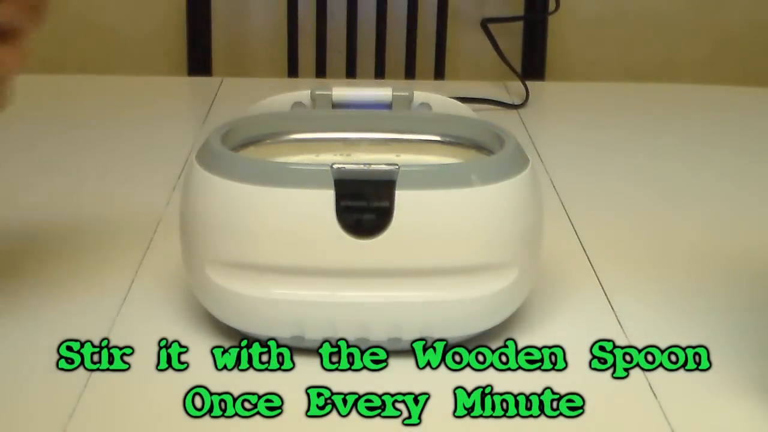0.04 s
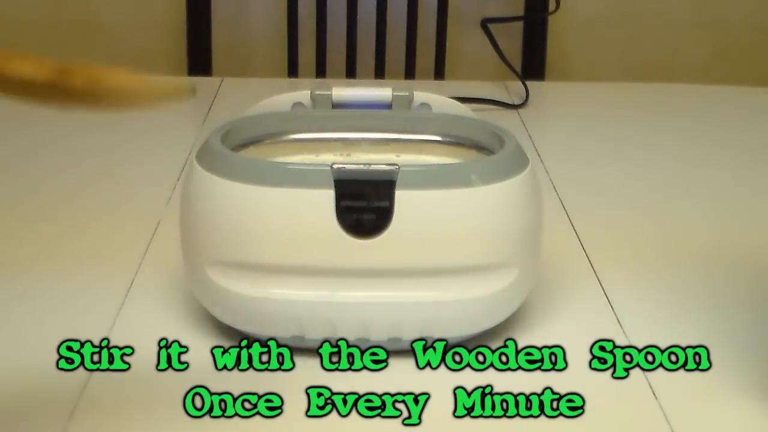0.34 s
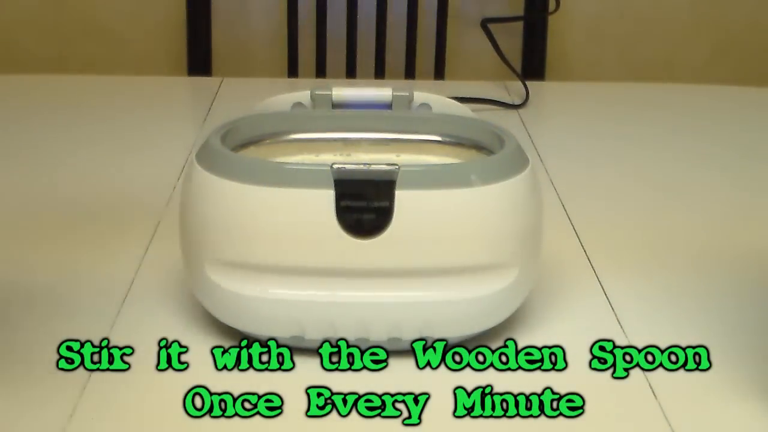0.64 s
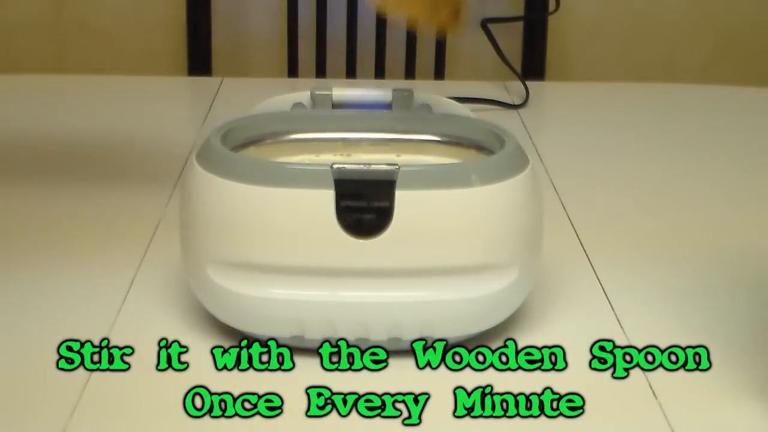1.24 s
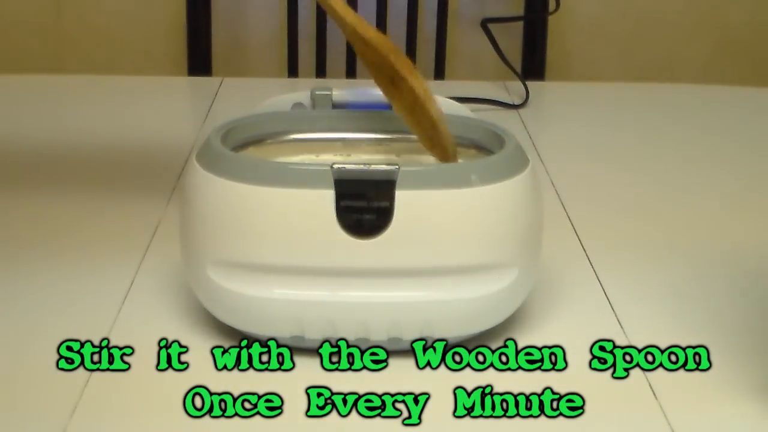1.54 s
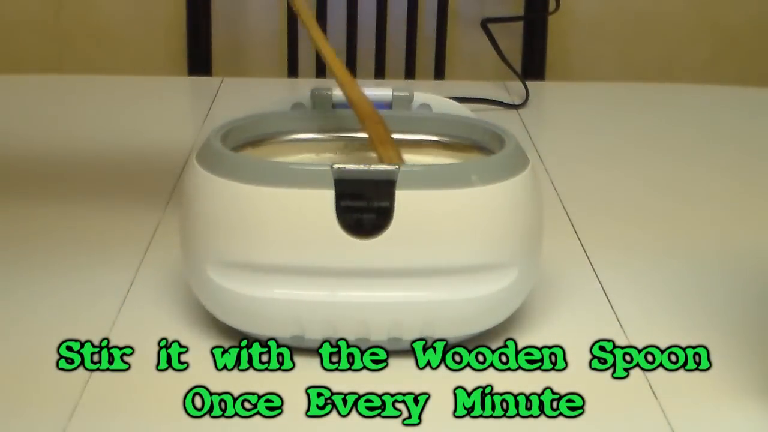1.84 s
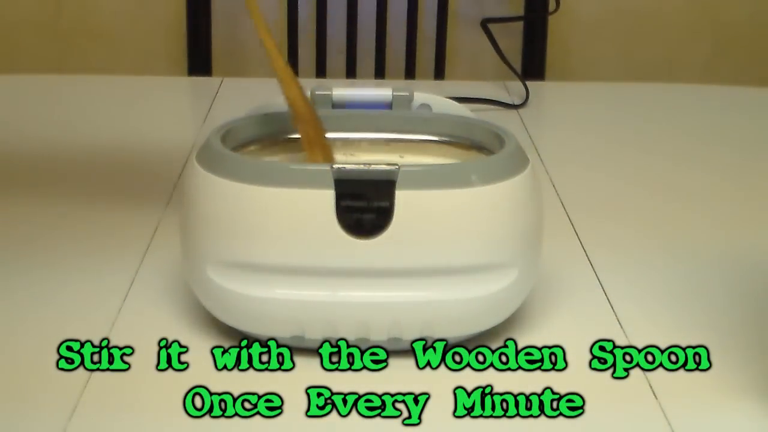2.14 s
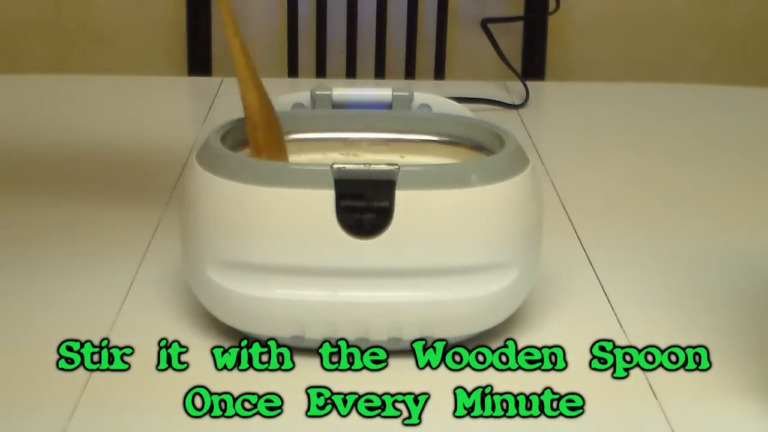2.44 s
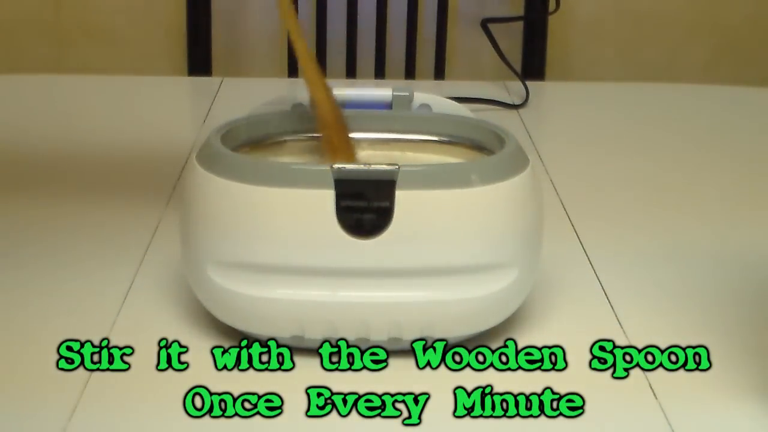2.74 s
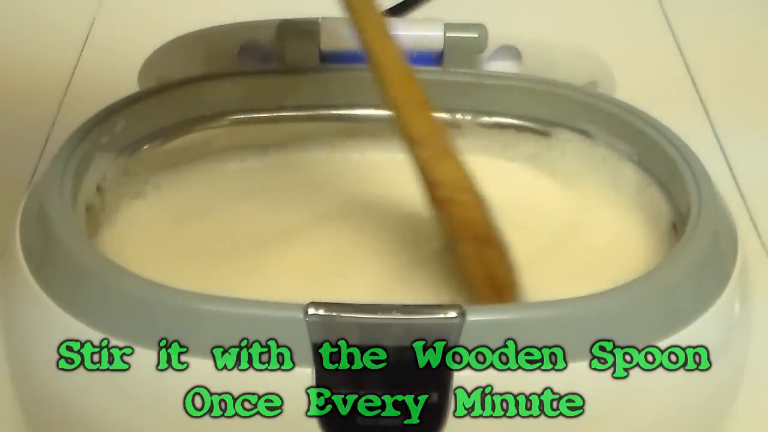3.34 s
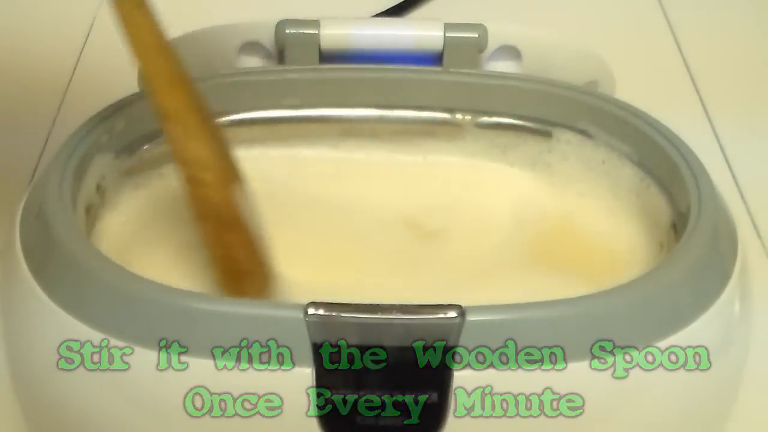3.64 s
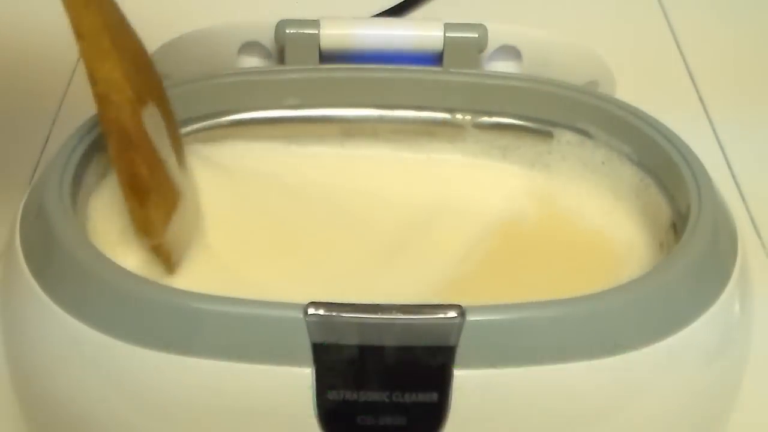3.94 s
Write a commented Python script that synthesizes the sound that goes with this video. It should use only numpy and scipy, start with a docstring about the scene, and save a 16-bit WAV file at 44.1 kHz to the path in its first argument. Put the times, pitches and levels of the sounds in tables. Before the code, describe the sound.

Fizzy ultrasonic cleaner buzz, turning close and raspy as a spoon stirs, with low thumps.

```python
"""An ultrasonic cleaner full of foamy liquid buzzes on a table: its tank rattles at harmonics of the mains,
and cavitation bubbles collapse in step, making the bath fizz. A wooden spoon dips in, loads the bath and
dulls the buzz, then knocks the tank into ringing and stirs. Heard first from afar and then from close by,
the buzz becomes one raspy burst per mains cycle over sloshing liquid.
Low thumps and a rumble open and close the scene."""
import sys
import numpy as np
from scipy import signal
from scipy.fft import rfft, irfft
from scipy.io import wavfile

SR = 44100
rng = np.random.default_rng(int(sys.argv[2]) if len(sys.argv) > 2 else 0)


def store_pcm(level_fs):
    """Save levels as 16-bit WAV."""
    pcm = np.round(np.clip(level_fs, -1, 1) * 32767).astype(np.int16)
    wavfile.write(sys.argv[1], SR, np.atleast_2d(pcm).T)


N = 176400
TIME = np.arange(N) / SR

MAINS_HZ, FIRST_HARMONIC = 60.0, 10
CLOSE_S, CROSSFADE_S = 2.94, 0.014  # when the bath is heard from close by
RING_HZ, RING_LAG_S = 1490, 0.00089  # each rattle rings around this pitch; lower partials arrive later
LOAD_LIFT_DB, LOAD_CUT_DB, LOAD_BAND_HZ, LOAD_EDGE_WIDTH_HZ = 3.2, -11, 750, 60
SWAY_CORRELATION = 0.7  # between neighbouring harmonics
THUMP_RISE_S, THUMP_T60_S = 0.018, 0.081
HISS_TOP_HZ, CUTOFF_HZ = 14400, 15800

# stereo image of the noises
COHERENCE = [(290, 0.62), (900, 0.56), (3100, 0.55), (6820, 0.2), (15000, 0.29)]  # (frequency [Hz], left-right coherence [0-1])
LEFT_BIAS = [(150, -6.5), (700, -1.5), (15000, 0.5)]  # (frequency [Hz], left minus right at apart=1 [dB])

# noise spectra (frequency [Hz], relative density [dB])
ROOM_SPECTRUM = [(35, -89.5), (70, -95), (350, -92.5), (560, -99), (1500, -108), (14000, -121)]
RUMBLE_SPECTRUM = [(48, -100), (80, -68.5), (130, -63.5), (190, -67.5), (255, -71), (310, -81.5),
                   (520, -73), (800, -91), (1500, -87), (3000, -94), (15000, -107)]
SLOSH_SPECTRUM = [(60, -100), (110, -89.5), (140, -80.5), (190, -89), (300, -85), (430, -89), (560, -76),
                  (680, -93), (900, -100), (2000, -120)]
DRAG_SPECTRUM = [(2500, -120), (3300, -99), (3800, -102), (4600, -90), (5300, -104), (8000, -120)]
FIZZ_SPECTRUM = [(200, -112), (500, -98.5), (1100, -96), (1650, -97.5), (2200, -97.5), (3000, -101),
                 (3900, -101.5), (4500, -104), (6500, -104), (8600, -106), (11500, -111), (14000, -112)]
STIRRED_FIZZ_SPECTRUM = [(300, -110), (700, -91), (1100, -111), (1600, -104), (2150, -99), (2600, -96.5),
                         (3200, -96.5), (3800, -105), (9000, -122)]
CLOSE_FIZZ_SPECTRUM = [(300, -110), (800, -96), (1900, -93.5), (2110, -94), (2300, -92), (3050, -96.5),
                       (3800, -95), (4800, -100), (6200, -100), (7100, -99.5), (8600, -103), (14000, -112)]
SIZZLE_SPECTRUM = [(4000, -125), (6500, -108), (7200, -103), (8600, -108), (10300, -94.5), (11700, -105),
                   (12800, -104), (14200, -107)]

# envelopes of the noises and of the buzz (time [s], gain [dB])
RUMBLE_GAIN = [(0, 1), (.06, 0), (.12, -6), (.165, -9), (.21, -43), (3.86, -65), (3.89, -3), (3.94, 1)]
SLOSH_GAIN = [(2.95, 1), (3.02, -0.5), (3.1, -5), (3.17, 1), (3.25, -5), (3.45, -2), (3.6, 0), (3.75, 2),
              (3.82, -2.5)]
DRAG_GAIN = [(2.63, -40), (2.66, 2), (2.73, -1.5), (2.81, -13), (2.9, -14)]
FIZZ_GAIN = [(0, 1.5), (.8, -2), (1.12, 0.5), (1.3, -.5), (1.7, 0), (2.1, 0.5), (2.32, 2.5), (2.5, -3.5),
             (2.6, -2.5), (2.7, .5)]
SIZZLE_GAIN = [(3.0, 0.5), (3.1, -7), (3.2, 0), (3.24, -3), (3.27, 5), (3.33, -1), (3.45, -9),
               (3.54, -10.5), (3.68, -2.5)]
REST_GAIN = [(0, -2.5), (.2, -1.5), (2.3, -1), (2.58, -7), (2.68, -25)]
STIRRED_GAIN = [(2.55, -6.5), (2.66, 2), (2.93, 1.5)]
CLOSE_GAIN = [(2.95, -1), (3.08, -2.5), (3.28, -0.5), (3.35, -4.5), (3.46, 0), (3.51, -3.5), (3.59, 3.5),
              (3.73, 1), (3.82, -1)]

# low thumps (time [s], level [dB], frequency [Hz])
LOW_THUMPS = [(.012, -32, 91.3), (0.057, -35.5, 87), (0.093, -35, 82), (0.154, -41, 82), (3.882, -27, 99),
              (3.922, -36, 98), (3.954, -35, 98.4), (3.983, -31, 116)]
# impacts of the spoon on the tank (time [s], level [dB])
SPOON_IMPACTS = [(2.598, -35.5), (2.606, -48), (2.621, -36.5), (2.633, -43), (3.16, -45.5), (3.377, -44)]
# modes of the tank (frequency [Hz], relative level [dB], T60 [s])
TANK_MODES = [(215, -16, .08), (400, -6.5, .06), (490, -10, .22), (610, -5, .035), (950, -8, .014)]
# loading of the bath by the spoon (time [s], depth [0-1], edge frequency [Hz])
SPOON_LOADING = [(1.6, 0, 2200), (1.95, .4, 2000), (2.25, 1, 1900), (2.5, 1, 1620), (2.65, 1, 1300)]

# mains harmonics from FIRST_HARMONIC up: bath at rest, stirred and from close by (relative level [dB])
REST_HARMONICS = [-72, -71, -73, -79, -68, -78, -66, -76, -68, -69, -70, -74, -65, -70, -75, -72, -62, -74,
                  -64, -72, -70, -65, -65, -69, -78, -68, -76, -78, -77, -86, -72, -77, -77, -78, -77, -76,
                  -78, -81, -79, -83, -78, -78, -84, -89, -80, -80, -81, -80, -82, -92, -83]
STIRRED_HARMONICS = [-74, -70.5, -75, -84, -71, -80, -68.5, -74, -67.5, -72.5, -68, -71, -74.5, -75.5, -80,
                     -79, -72.5, -76.5, -69.5, -68.5, -83, -72, -79, -74, -78, -73.5, -73, -92, -69.5, -76,
                     -77.5, -71.5]
CLOSE_HARMONICS = [-77, -77, -74, -78, -83, -78, -73, -82, -75, -69, -68, -78, -70, -67.5, -67, -70.5, -69,
                   -78, -72, -78, -80, -68.5, -67, -88, -70, -65, -72.5, -77, -74, -80.5, -79, -88.5, -74,
                   -73, -74, -78, -76, -75, -85.5, -83, -73.5, -70.5, -73.5, -86, -83]
# rattles of the tank within one mains cycle (position [cycles], weight [ratio])
FAR_CYCLE_RATTLES = [(.045, 1.0), (.29, 1.1), (.6, .8)]
CLOSE_CYCLE_RATTLES = [(0.531, 0.93), (0.609, 0.76), (.76, .6)]


def amp(db):
    """Amplitude ratio: a factor of ten per 20 dB."""
    return 10 ** (np.asarray(db) / 20)


def curve(points, column=1):
    """Linear interpolation of a control over time."""
    points = np.array(points)
    return np.interp(TIME, points[:, 0], points[:, column])


def spectrum_at(points, hz):
    """Linear interpolation of a spectrum on a logarithmic frequency axis."""
    frequency, value = np.transpose(points)
    return np.interp(np.log(hz + 1), np.log(frequency + 1), value)


def drift(rate_hz):
    """Slow random modulation: low-passed Gaussian noise of unit variance."""
    count = 2000
    hz = np.fft.rfftfreq(count, N / SR / count)
    slow = irfft(rfft(rng.standard_normal(count)) / (1 + (hz / rate_hz) ** 4))
    return np.interp(TIME, np.linspace(0, N / SR, count), slow / slow.std())


def noise(spectrum, envelope=0.99, apart=0.89, top_hz=HISS_TOP_HZ):
    """Partly coherent stereo noise, modulated and then filtered; apart scales the channel difference."""
    hz = np.fft.rfftfreq(2 * N, 1 / SR)
    mid, side = rfft(rng.standard_normal((2, N)) * envelope, 2 * N)
    coherence = spectrum_at(COHERENCE, hz)
    side = side * apart * np.sqrt((1 - coherence) / (1 + coherence))
    lean = amp(apart * spectrum_at(LEFT_BIAS, hz) / 2)
    colour = amp(spectrum_at(spectrum, hz)) * np.sqrt(SR / 2) * (hz < top_hz)
    return irfft(np.array([(mid + side) * lean, (mid - side) / lean]) * colour)[:, :N]


def room():
    """Stationary background noise, strongest at low frequencies."""
    return noise(ROOM_SPECTRUM)


def thumps():
    """Damped low sinusoids with soft onsets, inside a rumble of noise."""
    out = np.zeros(N)
    for start, db, hz in LOW_THUMPS:
        t = np.maximum(TIME - start, 0)
        swell = 1 - np.exp(-(t / THUMP_RISE_S) ** 2)
        decay = amp(db - 60 * (t - THUMP_RISE_S) / THUMP_T60_S)
        out += swell * decay * np.sin(2 * np.pi * hz * t)
    return out + noise(RUMBLE_SPECTRUM, amp(curve(RUMBLE_GAIN)), apart=0.056, top_hz=CUTOFF_HZ)


def slosh():
    """Liquid moving in the tank radiates low, slowly modulated noise."""
    return noise(SLOSH_SPECTRUM, apart=0.24) * amp(curve(SLOSH_GAIN))


def spoon_knocks():
    """Impacts of wood excite the liquid-damped modes of the tank; neighbours start in antiphase."""
    out = np.zeros(N)
    for start, db in SPOON_IMPACTS:
        t = np.maximum(TIME - start, 0)
        for k, (hz, mode_db, t60) in enumerate(TANK_MODES):
            out += (-1) ** k * amp(db + mode_db - 60 * t / t60) * np.sin(2 * np.pi * hz * t)
    return out


def spoon_drag(bursts):
    """The dragging spoon hisses briefly, amplitude-modulated by the cavitation bursts."""
    return noise(DRAG_SPECTRUM, bursts) * amp(curve(DRAG_GAIN))


def spoon_load(hz, depth, edge_hz):
    """Loading by the spoon, as a gain in dB: it lifts the buzz below an edge and damps a band above."""
    above = .5 + .5 * np.tanh((hz - edge_hz) / (2 * LOAD_EDGE_WIDTH_HZ))
    near = np.exp(-((hz - edge_hz) / LOAD_BAND_HZ) ** 2)
    return depth * (LOAD_LIFT_DB * (1 - above) + LOAD_CUT_DB * above * near)


def cavitation(peak, rise, fall, floor, flicker_db, grain_db):
    """Envelope of bubble collapse, one burst per mains cycle; peak, rise and fall are in cycles."""
    since = (TIME * MAINS_HZ - peak + .5) % 1 - .5
    burst = floor + np.exp(-np.where(since < 0, (since / rise) ** 2, since / fall))
    grains = np.repeat(rng.standard_normal(N // 16 + 1), 16)[:N]
    envelope = burst * amp(flicker_db * drift(25) + grain_db * grains)
    return envelope / np.sqrt(np.mean(envelope ** 2))


def buzz(harmonics, rattles, scatter_rad, waver, waver_hz, width, loaded=False):
    """Mains harmonics interfere to form rattles; moving liquid modulates their amplitude and phase."""
    out = np.zeros((2, N))
    depth, edge_hz = curve(SPOON_LOADING), curve(SPOON_LOADING, column=2)
    sway = np.array([drift(waver_hz), drift(waver_hz)])  # in phase and in quadrature
    for k, db in enumerate(harmonics, FIRST_HARMONIC):
        hz = k * MAINS_HZ
        fresh = np.array([drift(waver_hz), drift(waver_hz)])
        sway = SWAY_CORRELATION * sway + np.sqrt(1 - SWAY_CORRELATION ** 2) * fresh
        rattle_phase = np.angle(sum(weight * np.exp(-2j * np.pi * k * at) for at, weight in rattles))
        ratio = hz / RING_HZ
        dispersion = 2 * np.pi * RING_LAG_S * RING_HZ * (np.log(ratio) - ratio + 1) + np.pi / 2
        phase = 2 * np.pi * hz * TIME + rattle_phase - dispersion + scatter_rad * rng.standard_normal()
        gain = np.sqrt(2) * amp(db + (spoon_load(hz, depth, edge_hz) if loaded else 0))
        cos, sin = gain * np.cos(phase), gain * np.sin(phase)
        mid = (cos * (1 + waver * sway[0]) + sin * waver * sway[1]) / np.sqrt(1 + 2 * waver ** 2)
        side = width * (cos * rng.standard_normal() + sin * rng.standard_normal())
        out += [mid + side, mid - side]
    return out


def cleaner_afar():
    """Forced vibration and cavitation noise; stirring scatters the phases of the harmonics."""
    rest = buzz(REST_HARMONICS, FAR_CYCLE_RATTLES,
                scatter_rad=.22, waver=.1, waver_hz=7, width=.05, loaded=True)
    stirred = buzz(STIRRED_HARMONICS, FAR_CYCLE_RATTLES, scatter_rad=1.1, waver=.3, waver_hz=6, width=.05)
    bursts = cavitation(peak=.06, rise=.15, fall=.45, floor=1.2, flicker_db=.6, grain_db=1.9)
    fizz = noise(FIZZ_SPECTRUM, bursts) * amp(curve(FIZZ_GAIN))
    stirred += noise(STIRRED_FIZZ_SPECTRUM, bursts)
    return rest * amp(curve(REST_GAIN)) + stirred * amp(curve(STIRRED_GAIN)) + fizz + spoon_drag(bursts)


def cleaner_close():
    """Deep modulation sounds rough: rattles, fizz and sizzling foam bunch into one burst per cycle."""
    rasp = buzz(CLOSE_HARMONICS, CLOSE_CYCLE_RATTLES, scatter_rad=.3, waver=.33, waver_hz=3.7, width=.039)
    bursts = cavitation(peak=.622, rise=.096, fall=.14, floor=.32, flicker_db=1.85, grain_db=2.0)
    gain_db = curve(CLOSE_GAIN)
    fizz = noise(CLOSE_FIZZ_SPECTRUM, bursts, apart=.56) * amp(.33 * gain_db)
    sizzle = noise(SIZZLE_SPECTRUM, bursts) * amp(curve(SIZZLE_GAIN))
    return rasp * amp(gain_db) + fizz + sizzle


def scene():
    """Superposition of the sources, with a crossfade from the distant bath to the close one."""
    close = np.clip((TIME - CLOSE_S) / CROSSFADE_S + .5, 0, 1)
    bath = (1 - close) * cleaner_afar() + close * (cleaner_close() + slosh())
    return bath + spoon_knocks() + thumps() + room()


def record(dry):
    """Band limiting by a linear-phase low-pass filter."""
    lowpass = signal.firwin(511, CUTOFF_HZ, window=("kaiser", 9), fs=SR)
    return signal.oaconvolve(dry, lowpass[None], "same")


dry = scene()
out = record(dry)
store_pcm(out)
```